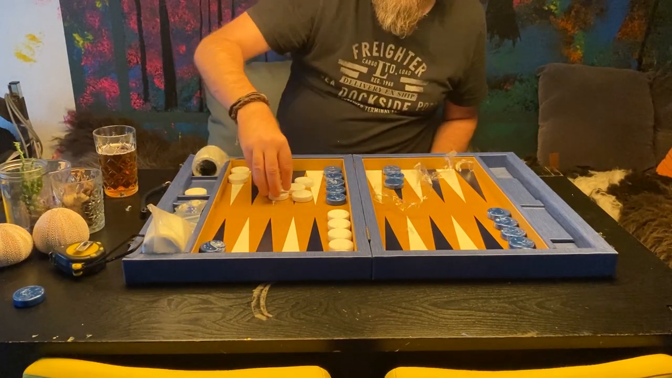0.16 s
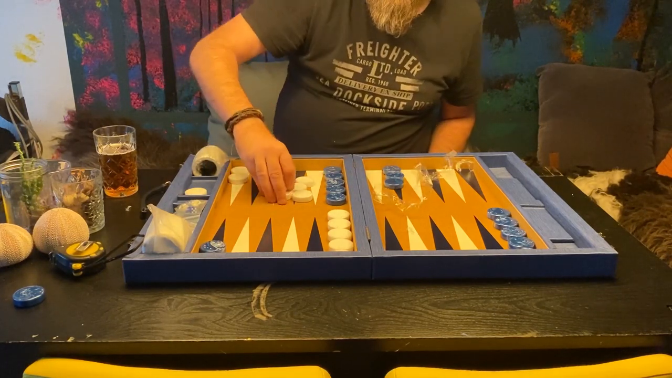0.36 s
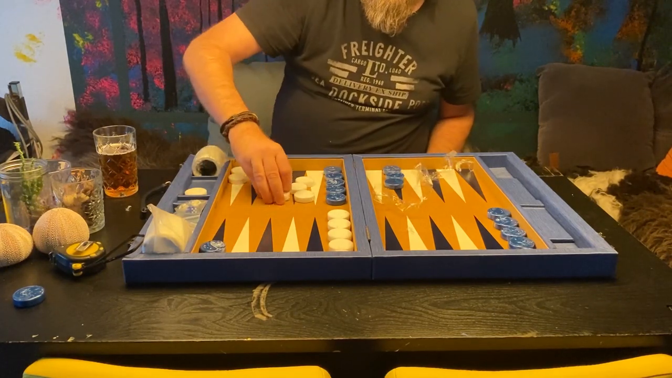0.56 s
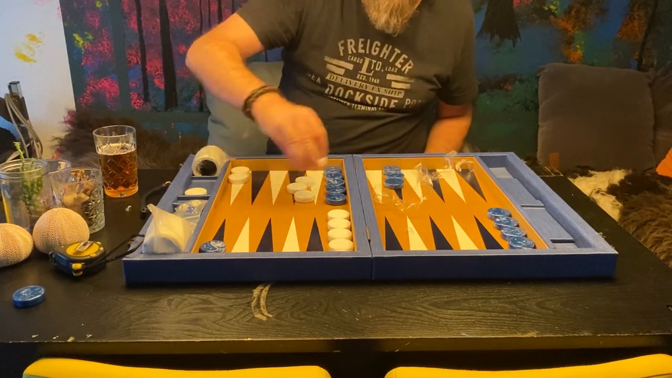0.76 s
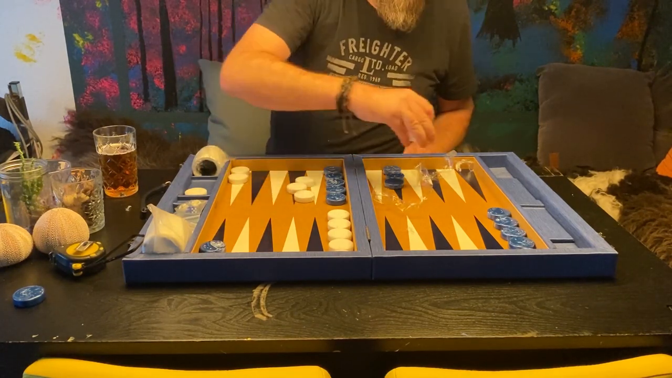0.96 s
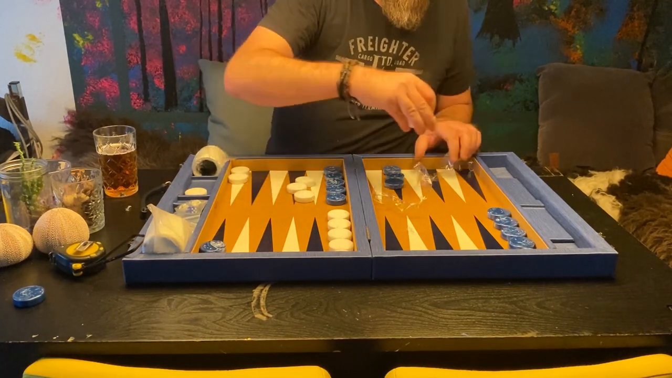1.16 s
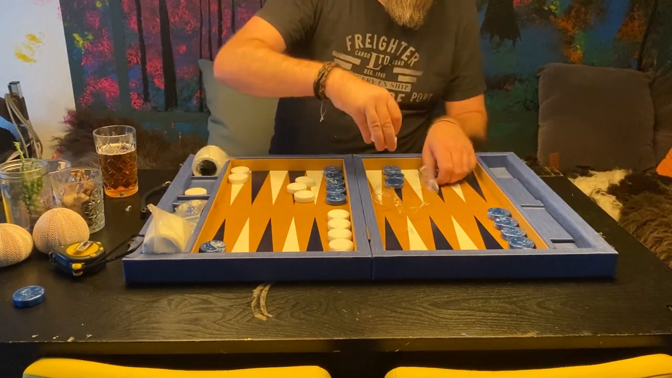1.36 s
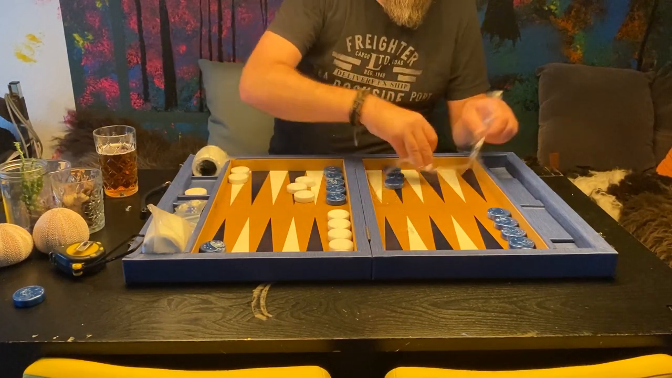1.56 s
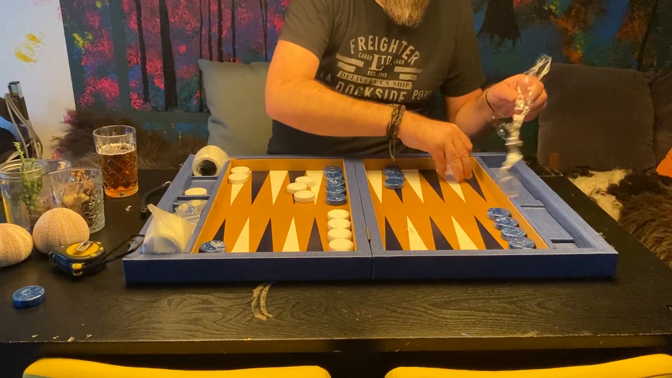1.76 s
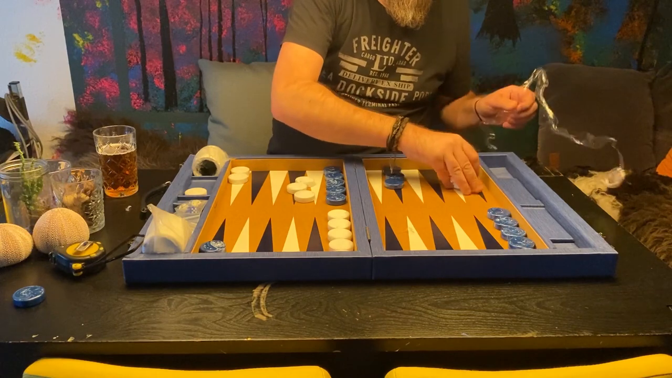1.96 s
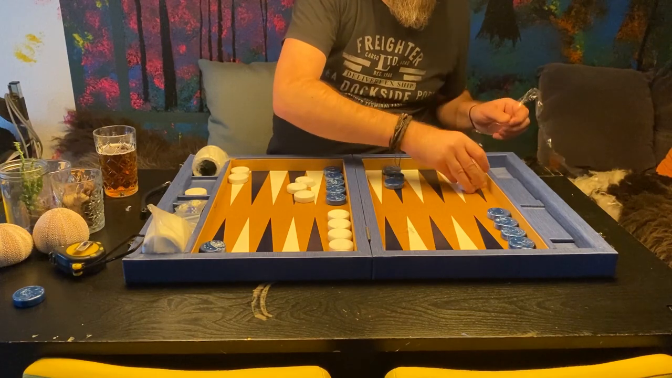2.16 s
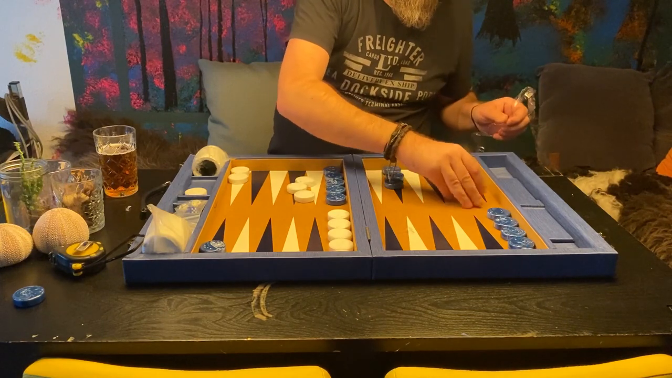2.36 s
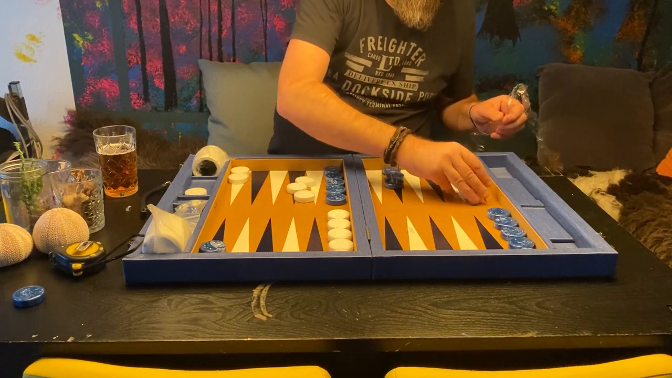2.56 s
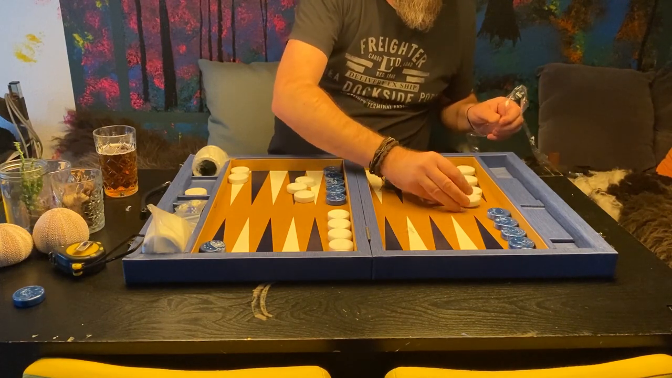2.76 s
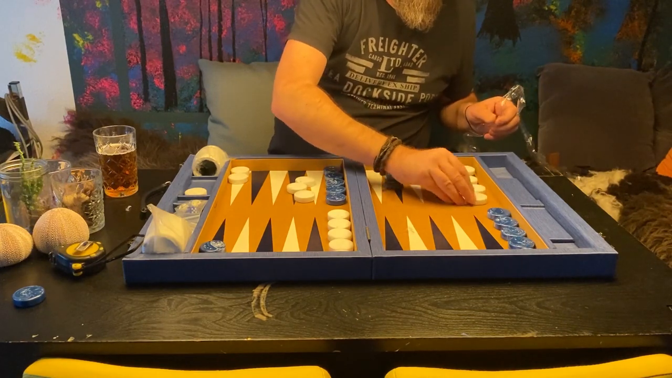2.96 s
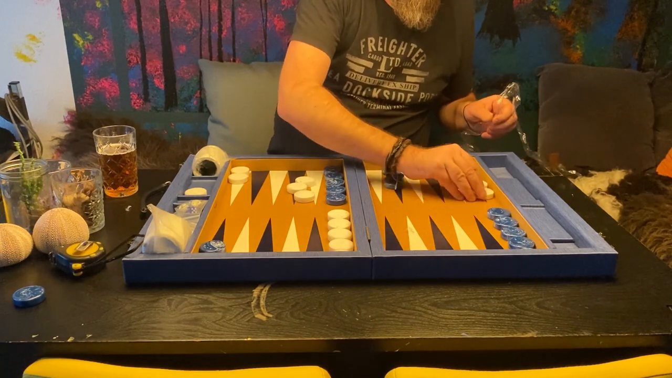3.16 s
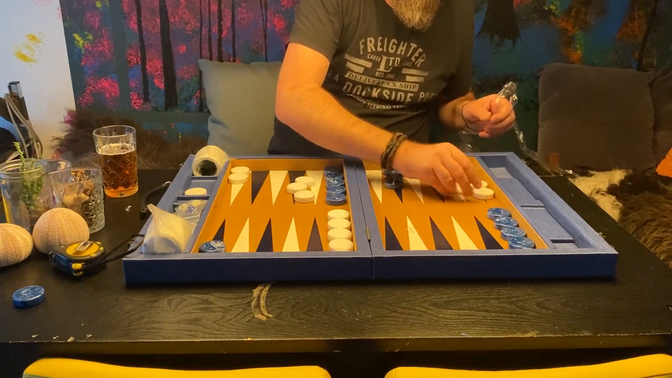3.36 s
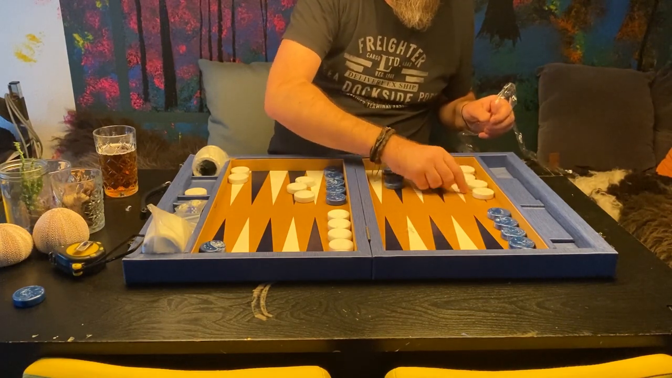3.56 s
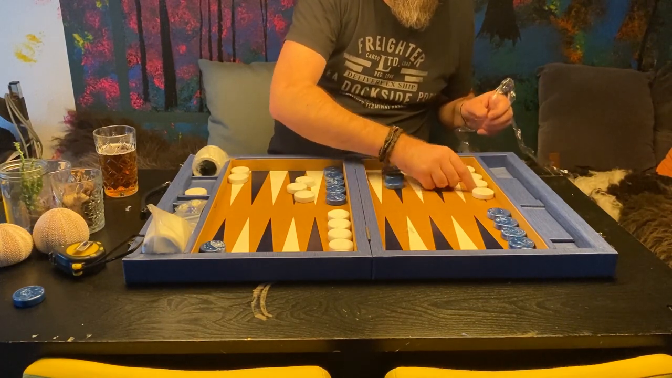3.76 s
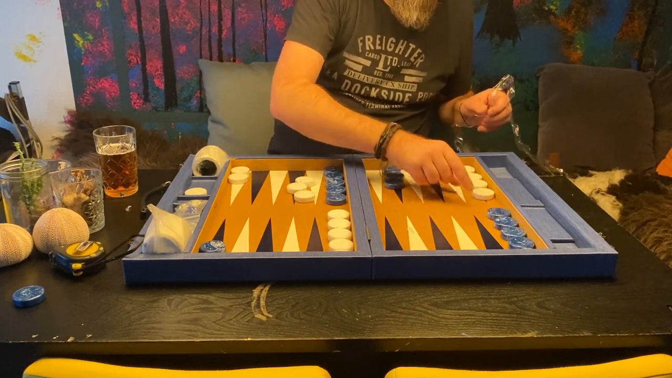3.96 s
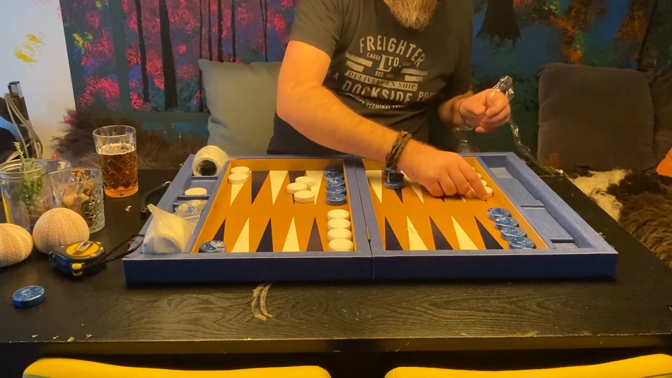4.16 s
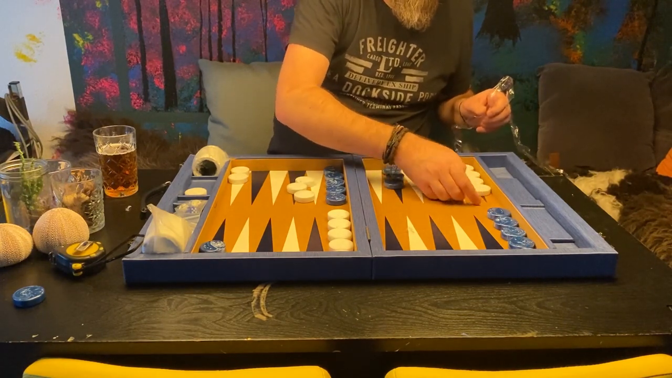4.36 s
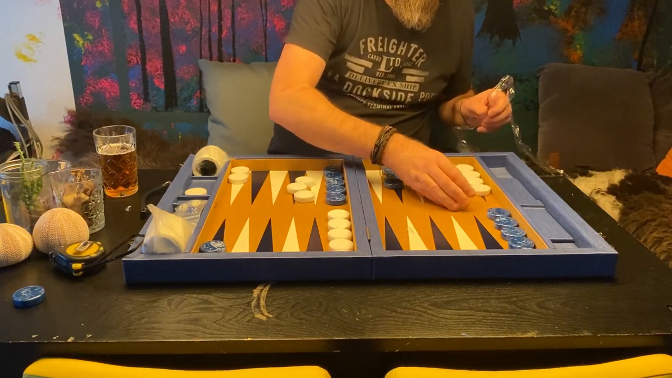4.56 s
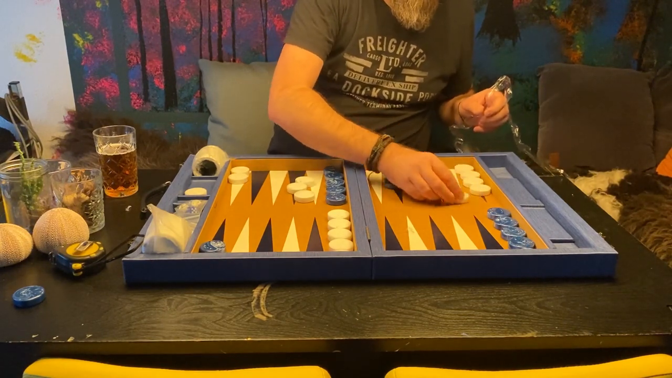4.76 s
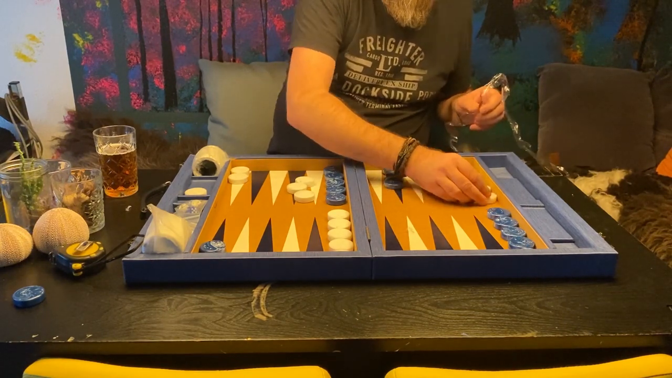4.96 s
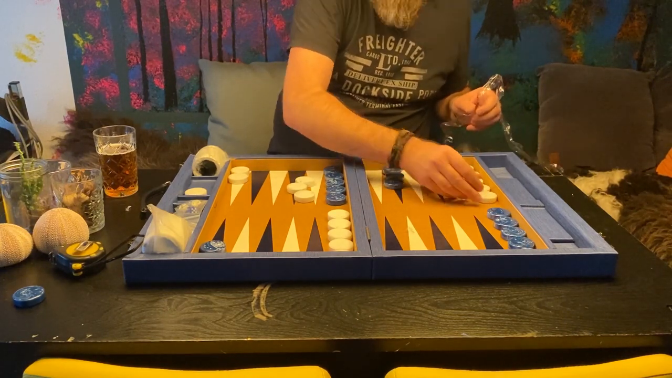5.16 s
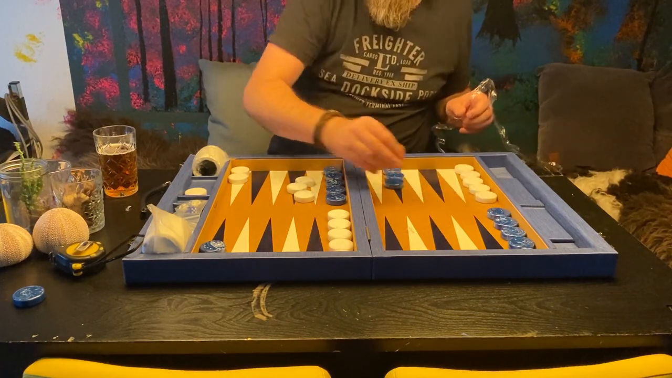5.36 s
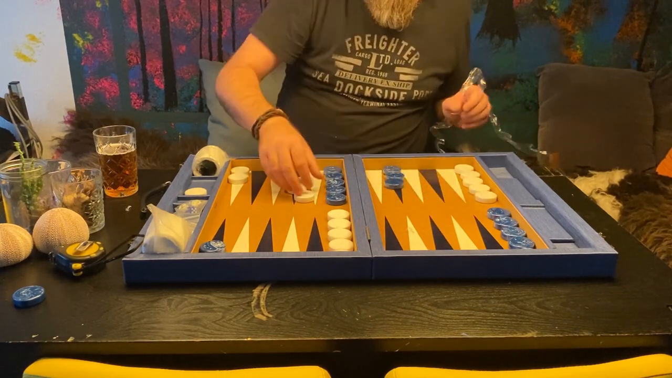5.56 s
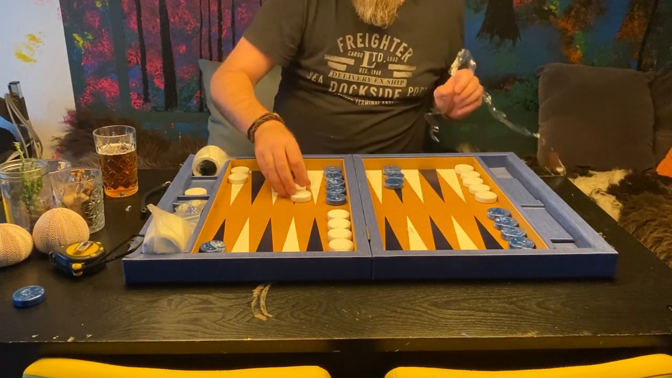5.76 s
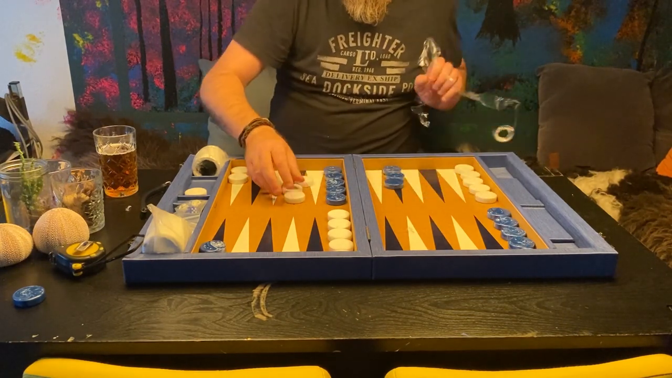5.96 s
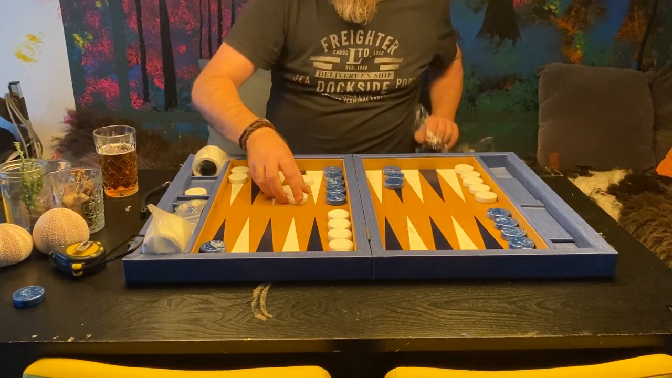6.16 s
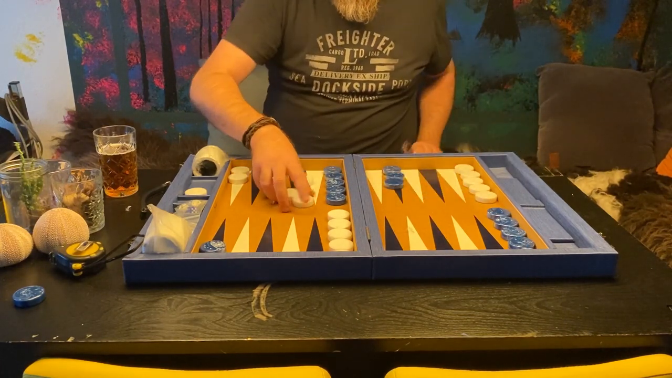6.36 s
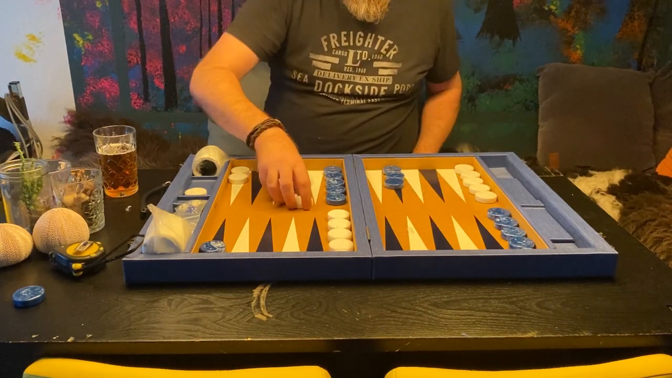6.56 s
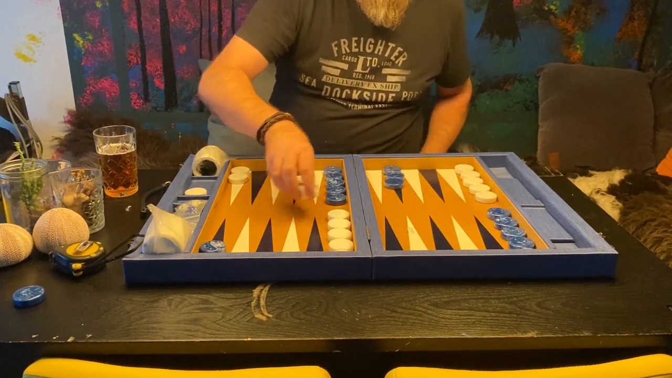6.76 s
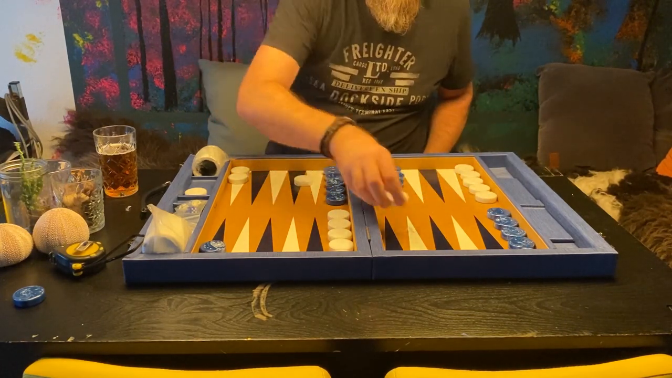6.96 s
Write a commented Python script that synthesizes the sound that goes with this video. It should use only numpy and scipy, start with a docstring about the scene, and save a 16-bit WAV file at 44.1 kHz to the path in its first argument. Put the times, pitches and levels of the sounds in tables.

```python
"""Checkers on a felt-lined wooden board in a furnished room. A hard plastic piece is set down and slid:
each touch clicks, knocks the hollow board and rings the checker. A plastic wrapper crackles, then a
busy clatter follows, with hand and board thumping the table. After a lull comes a second flurry, which
thins out into slides, a few snaps and soft knocks. A distant microphone with two treble notches hears
it all, with the room's tail on every blow and a quiet noise floor underneath."""
import sys
import numpy as np
from scipy import signal
from scipy.fft import rfft, irfft
from scipy.io import wavfile
from scipy.ndimage import uniform_filter1d

SR = 44100
rng = np.random.default_rng(int(sys.argv[2]) if len(sys.argv) > 2 else 0)


def file_out(sig):
    """Save sig as 16-bit WAV at sys.argv[1]."""
    # one column per channel
    cols = np.atleast_2d(sig).T
    # limit, then scale
    lim = np.clip(cols, -1, 1)
    pcm = np.round(lim * 32767).astype(np.int16)
    wavfile.write(sys.argv[1], SR, pcm)


N = 309141

# hand and board landing on the table: (time [s], level [dB], pitch [Hz])
TABLE_THUMPS = [(0.051, -83, 160), (0.338, -39.5, 133.4), (1.332, -48.5, 155.6), (1.357, -48, 132.8),
                (1.748, -39, 144.6), (2.09, -43.5, 167), (2.151, -45.5, 155), (2.478, -41.5, 157),
                (2.569, -42, 128.3), (2.693, -41, 149), (2.753, -42, 147), (2.994, -49.5, 152),
                (3.165, -49.5, 210.4), (3.735, -50.5, 160), (3.808, -61, 183), (4.137, -55.5, 139),
                (4.242, -52.5, 136), (4.522, -46.5, 146), (4.595, -44.5, 134), (4.772, -49.5, 126),
                (4.807, -44, 164), (5.04, -49.5, 152.4), (5.349, -73.5, 153.6), (5.713, -54, 117.2),
                (6.188, -49.5, 141.4), (6.291, -58, 110), (6.463, -52, 130), (6.502, -47, 145.4)]


def amp(db):
    """Decibels to gain."""
    return 10 ** (np.asarray(db) / 20)


def unit_rms(x):
    """Scale to an rms of one."""
    return x / np.sqrt(np.mean(x ** 2) + 1e-20)


def curve_at(points, hz, column=1):
    """Read a column of a table along a log-frequency axis."""
    points = np.array(points)
    return np.interp(np.log(hz), np.log(points[:, 0]), points[:, column])


def band(x, low_hz, high_hz):
    """Gentle band-pass."""
    edges = [low_hz, min(high_hz, SR / 2.2)]
    return signal.sosfilt(signal.butter(2, edges, "band", fs=SR, output="sos"), x)


def place(track, time_s, sound, level_db):
    """Mix a one-shot in, with its loudest 4 ms at the given rms level."""
    start = int(time_s * SR)
    loudest = np.sqrt(uniform_filter1d(sound ** 2, size=176, mode="constant").max())
    track[start:start + len(sound)] += (amp(level_db) * sound / loudest)[:N - start]


def struck(hz, gains, t60, rise_s, size=4096):
    """A struck body: damped modes that swell while the contact lasts."""
    t = np.arange(size) / SR
    decays = amp(-60 * np.outer(1 / np.asarray(t60), t))
    rings = np.sin(2 * np.pi * np.outer(hz, t)) * decays
    return (gains @ rings) * (1 - np.exp(-t / rise_s)) ** 2


def blunt_hit(hz, chance_db, cycles, rise_s):
    """A blunt contact excites close, dead modes around one pitch, two of them in opposite phase."""
    modes_hz = hz * np.array([.78, .9, 1, 1.12, 1.35])
    gains = amp([-19.5, -3, 8.5, -7, 2.5] + chance_db) * [-1, 1, 1, -1, 1]
    return struck(modes_hz, gains, cycles / modes_hz, rise_s)


def room_tone():
    """A steady, bass-heavy bed of room and microphone noise."""
    # noise spectrum: (frequency [Hz], relative density [dB])
    spectrum = [(15, -49), (25, -21.5), (70, -21), (91, -17.5), (112, -9.5), (131, -12), (208, -19),
                (283, -23), (331, -23), (600, -33.5), (954, -38.5), (1440, -41), (3850, -48.5), (6290, -52),
                (11500, -52), (14000, -85.5), (22000, -120)]
    hz = np.arange(N // 2 + 1) * SR / N + 1
    noise = irfft(rfft(rng.standard_normal(N)) * amp(curve_at(spectrum, hz)), N)
    return amp(-67.5) * unit_rms(noise)


def room_reverb(spots):
    """Strong echoes off table and near walls, then a tail dying band by band; each spot has its own."""
    # the room's tail: (frequency [Hz], t60 [s], relative level [dB])
    decay = [(80, 0.29, 4), (212, 0.68, 8), (570, 0.59, 11), (1380, 0.54, 6.5), (3600, 0.55, -1),
             (10100, 0.38, 7)]
    first_echo_s, early_db, early_t60_s = .004, 11, .028
    t = np.arange(SR) / SR
    density = np.clip(.024 + (t / .06) ** 2, 0, 1)   # echoes thicken with the square of time
    arrivals = (rng.random((2, len(spots), SR)) < density) * (t > first_echo_s) / np.sqrt(density)
    early_lift = 1 + amp(early_db - 60 * t / early_t60_s)
    echoes = rng.standard_normal(arrivals.shape) * arrivals * early_lift
    edges_hz, tails = 40 * 2 ** np.arange(0, 9, .5), 0
    for k, (low, high) in enumerate(zip(edges_hz, edges_hz[1:])):
        hz = np.sqrt(low * high)
        fade = amp(curve_at(decay, hz, column=2) - 60 * t / curve_at(decay, hz))
        tails = tails + band(echoes[k % 2] * fade, low, high)
    return signal.fftconvolve(spots, tails / np.sqrt(SR / 40), axes=1)[:, :N].sum(axis=0)


def frame_rumble():
    """The table frame shakes faintly all the time and shudders on after every thump."""
    rest_db, send_db, t60_s = -85.5, -22.5, .8
    evening = .6   # share of the thumps' level swings that the frame does not follow
    time_s, level_db, _ = np.transpose(TABLE_THUMPS)
    kicks = np.zeros(N)
    kicks[(time_s * SR).astype(int)] = amp(level_db + send_db - evening * (level_db - level_db.mean()))
    shudder = signal.lfilter([1], [1, -amp(-60 / (t60_s * SR))], kicks)
    sub_noise = unit_rms(band(rng.standard_normal(N), 28, 50))
    return band((amp(rest_db) + shudder) * sub_noise, 20, 70)


def hiss_and_scuff():
    """Rubbing strokes and the bright tails of hard hits: dense uneven grains that swell and fade."""
    # swells of hiss and scuff: (peak time [s], rise [s], fade [s], hiss [dB], scuff [dB])
    swells = [(.35, 0.031, 0.27, -49.5, -53.5), (0.661, 0.076, 0.08, -58, -65), (.98, .05, .04, -68, -81),
              (1.22, .02, .2, -56, -59.5), (1.299, .04, 0.033, -54, -57), (1.432, 0.066, 0.24, -36, -41),
              (1.66, 0.018, 0.12, -88, -62), (1.78, 0.12, 0.081, -80, -53), (2.05, 0.12, 0.038, -56, -69),
              (2.109, 0.015, 0.052, -33, -28), (2.2, 0.089, 0.052, -52, -52.5),
              (2.36, 0.095, 0.17, -61, -56.5), (2.49, 0.059, .05, -62.5, -53.5),
              (2.58, .02, .05, -51.5, -51.5), (2.69, 0.011, .05, -57.5, -48.5),
              (3.05, .09, 0.12, -52, -48.5), (3.34, 0.023, .06, -43.5, -60),
              (3.451, .1, 0.067, -54.5, -57.5), (3.77, .12, 0.036, -54, -70), (3.9, 0.14, 0.18, -57.5, -64),
              (4.16, .04, 0.048, -55.5, -60.5), (4.25, 0.065, .15, -67, -58), (4.57, .07, 0.21, -45.5, -51),
              (4.82, .2, 0.59, -60, -61), (5.18, 0.11, .05, -85, -58), (5.35, .14, .09, -67.5, -76),
              (5.779, 0.41, .2, -57.5, -65), (5.88, .1, .05, -49.5, -56), (5.97, .05, .09, -74.5, -59.5),
              (6.25, .08, 0.38, -52.5, -55), (6.37, 0.3, 0.14, -60, -60.5),
              (6.518, 0.076, 0.17, -35, -41.5), (6.75, .3, 0.26, -52, -53.5), (6.97, .04, .1, -90, -66)]
    drop_db, scuff_linger = 28, 1.5   # the hiss drops this far over a rise or fade; the scuff is slower
    felt_hz, felt_db = 4700, -15.5   # felt under plastic favours one band
    t = np.arange(N) / SR
    hiss_gain, scuff_gain = 0, amp(-85.5)   # a trace of scuff stays between swells
    for peak_s, rise_s, fade_s, hiss_db, scuff_db in swells:
        lost_db = drop_db * np.maximum((peak_s - t) / rise_s, (t - peak_s) / fade_s) ** 1.06
        hiss_gain = hiss_gain + amp(hiss_db - lost_db)
        scuff_gain = scuff_gain + amp(scuff_db - lost_db / scuff_linger)
    grains = rng.standard_normal((2, N)) * amp(3.2 * np.minimum(rng.exponential(1, (2, N)), 5))
    flicker_db = 2 * unit_rms(band(rng.standard_normal(N), 8.1, 40))   # rubbing catches and slips
    grains *= amp(flicker_db)
    hiss = signal.sosfilt(signal.butter(8, 15000, fs=SR, output="sos"), band(grains[1], 8800, 12000))
    felt = unit_rms(band(grains[0], felt_hz / 1.3, felt_hz * 1.15))
    scuff = unit_rms(band(grains[0], 710, 7000)) + amp(felt_db) * felt
    return hiss_gain * unit_rms(hiss) + scuff_gain * unit_rms(scuff)


def table_thumps():
    """Soft blows set the table top booming."""
    track = np.zeros(N)
    for time_s, level_db, hz in TABLE_THUMPS:
        modes_hz = hz * np.array([.4, .75, 1, 1.4, 2, 2.7])
        boom = struck(modes_hz, amp([-15, -4, -1, -3, -3, 0]), t60=15 / modes_hz, rise_s=.0038, size=16384)
        place(track, time_s, boom, level_db)
    return track


def bright_snaps():
    """Wrapper creases and the catch as a stroke begins: a few milliseconds of noise with a bright top."""
    # short bright snaps: (time [s], level [dB], centre [Hz], top end [dB])
    snaps = [(1.2042, -54.5, 5590, -82), (1.285, -46.5, 4660, -59), (1.391, -33, 4740, -38),
             (1.405, -43, 4580, -36.5), (1.4283, -30.5, 5130, -48), (1.436, -31.5, 4234, -39.5),
             (1.4462, -26.5, 3590, -20.5), (1.4687, -30, 3450, -48.5), (1.502, -58.5, 4730, -31),
             (1.5027, -24, 4600, -29), (1.5389, -41, 2030, -32.5), (1.6614, -37.5, 4980, -38),
             (1.721, -34.5, 6860, -55), (3.3291, -51, 3880, -48), (3.4188, -55, 4600, -45),
             (3.666, -68, 4010, -66), (5.3511, -46.5, 4400, -49), (5.686, -63, 4500, -64),
             (5.9643, -52.5, 3850, -47.5), (5.9882, -55, 4650, -61), (6.154, -61, 4880, -54),
             (6.2923, -43, 2860, -37), (6.964, -64, 3470, -51)]
    track, t60_s = np.zeros(N), .014
    fade = amp(-60 * np.arange(1024) / SR / t60_s)
    for time_s, level_db, hz, top_db in snaps:
        burst = rng.standard_normal(1024) * fade
        place(track, time_s, band(burst, hz / 1.42, hz * 1.8), level_db)
        place(track, time_s, band(burst, 7500, 12000), top_db)
    return track


def checker_touches():
    """Plastic meets board or plastic: a click with a noisy edge, a knock of board and rim, a thin ring."""
    # checkers landing and colliding: (time [s], click [dB], click pitch [Hz], board knock [dB],
    # knock pitch [Hz], rim [dB], rim pitch [Hz], checker ring [dB])
    hits = [(.3344, -30.5, 5960, -41.5, 348, -28.5, 2407, -33.5),
            (.3375, -42.5, 4200, -40.5, 1010, -39.5, 2700, -37.5),
            (.8764, -95, 3300, -72, 812, -99, 2400, -100),
            (1.5747, -57.5, 5240, -64, 1707, -37.5, 2020, -40),
            (1.7416, -45, 3120, -27, 1220, -37.5, 2300, -51),
            (1.7565, -41, 3500, -25.5, 1540, -38, 2080, -46),
            (1.8008, -34.5, 2710, -39.5, 940, -29.5, 2160, -45),
            (1.8083, -43.5, 4200, -27.5, 1300, -31.5, 2290, -61),
            (1.8556, -47, 4440, -37, 1100, -45, 2700, -65),
            (1.8921, -55, 5460, -35, 1510, -36.5, 1900, -71),
            (2.0845, -51.5, 3280, -31.5, 1050, -38, 1730, -55),
            (2.1019, -33, 5500, -31.5, 850, -59, 2880, -13.5),
            (2.1101, -26.5, 6160, -31.5, 1340, -37, 1870, -22.5),
            (2.1476, -27.5, 5600, -29.5, 1400, -31.5, 2500, -27),
            (2.193, -27, 4530, -41, 790, -38, 2200, -37),
            (2.4718, -41.5, 4360, -22.5, 1010, -33, 1944, -41.5),
            (2.4928, -40, 5270, -29.5, 1170, -31.5, 1800, -43),
            (2.4981, -42, 4900, -36, 960, -38, 2470, -35.5),
            (2.5061, -40.5, 4530, -33.5, 533, -52, 2160, -45),
            (2.5369, -39, 5040, -36, 780, -43, 1950, -31.5),
            (2.5672, -33.5, 5400, -29.5, 800, -29.5, 1840, -35.5),
            (2.5892, -40.5, 3400, -33, 980, -40, 1920, -51),
            (2.6887, -48.5, 3770, -32.5, 870, -46, 2480, -50),
            (2.694, -29, 4190, -36.5, 430, -34, 2400, -54.5),
            (2.7467, -58, 3360, -39, 990, -24.5, 1660, -41),
            (2.7512, -32.5, 2940, -23.5, 990, -28.5, 1850, -41),
            (2.8943, -55.5, 4470, -34, 910, -45, 2120, -73),
            (2.9913, -44.5, 4660, -33, 873, -39.5, 2160, -57),
            (3.036, -26.5, 4520, -46.5, 663, -32, 2520, -42.5),
            (3.111, -32.5, 3830, -51.5, 1010, -47, 2570, -44),
            (3.7333, -70.5, 3610, -54, 373, -78, 2810, -74),
            (3.8085, -39.5, 3510, -54.5, 1180, -48.5, 1900, -55),
            (4.2364, -27, 3640, -40, 1130, -51, 2370, -40), (4.2718, -38, 3500, -45, 1230, -40, 2760, -61),
            (4.2852, -27, 3840, -39.5, 1180, -33.5, 2310, -43),
            (4.3389, -35.5, 4100, -48.5, 725, -70, 2800, -57),
            (4.3502, -50, 4250, -59, 1560, -43, 2560, -47), (4.5205, -69, 3560, -40, 600, -59, 2200, -71.5),
            (4.5932, -45, 5300, -26, 1100, -34.5, 2010, -61),
            (4.6059, -63, 3730, -42, 1120, -66, 2010, -66.5),
            (4.6907, -57, 4100, -35, 900, -41.5, 1870, -54),
            (4.7711, -61, 3380, -31.5, 850, -40.5, 1930, -49.5),
            (4.808, -45.5, 5350, -29.5, 1090, -34.5, 1880, -66),
            (5.0721, -36, 4140, -51.5, 1620, -47, 2430, -43),
            (5.0845, -51, 3880, -58, 1690, -39, 2560, -66),
            (5.0932, -36.5, 4170, -54.5, 740, -49, 2600, -60),
            (5.1038, -37, 4100, -50.5, 1650, -44, 2120, -50.5),
            (5.113, -47, 4060, -70.5, 1300, -39.5, 2780, -51.5),
            (5.717, -79, 4880, -55, 927, -73.5, 1900, -75.5), (5.7447, -79, 3430, -58, 960, -77, 1990, -68),
            (6.1992, -79, 3250, -41, 900, -42.5, 2430, -53.5),
            (6.2198, -49.5, 3330, -41.5, 850, -44, 2160, -57),
            (6.4543, -81, 4500, -30, 930, -47, 1840, -57.5), (6.4894, -55, 3430, -41, 1030, -41, 2000, -53),
            (6.5061, -50, 3700, -39, 1060, -38.5, 1840, -48),
            (6.9385, -59, 2830, -61, 1420, -54, 2400, -93)]
    # modes of the hollow board: (frequency [Hz], relative level [dB], t60 [s])
    board_modes = [(330, -2, .02), (415, 2, .03), (520, -3, .012), (640, -3, .012), (800, 0, .018),
                   (930, 0, .02), (1000, 0, .02), (1180, 0, .018), (1250, -1, .014), (1385, 0, .012),
                   (1600, -3, .008)]
    # modes of a checker: (frequency [Hz], relative level [dB], t60 [s])
    checker_modes = [(10370, -3, .012), (10540, 0, .022), (10680, -3, .012)]
    board_hz, board_db, board_t60 = np.transpose(board_modes)
    checker_hz, checker_db, checker_t60 = np.transpose(checker_modes)
    spots = np.zeros((4, N))   # touches take turns among four spots on the board
    direct = np.zeros(N)   # extra click and knock, beamed straight at the microphone
    chances_db = 2.5 * rng.normal(0, 1, (len(hits), len(board_modes)))
    polarity = (-1) ** (np.arange(len(board_modes)) // 3)   # opposed groups of modes make a knock swell
    bursts = rng.standard_normal((len(hits), 256)) * amp(-60 * np.arange(256) / SR / .001)
    for k, (time_s, click_db, click_hz, knock_db, knock_hz, rim_db, rim_hz, ring_db) in enumerate(hits):
        spot, chance_db = spots[k % 4], chances_db[k]
        contact_s = .00016 * amp(-(click_db + 25) / 2)   # the softer the touch, the longer the contact
        click = blunt_hit(click_hz, chance_db[:5], cycles=12, rise_s=contact_s)
        place(spot, time_s, click, click_db)
        place(direct, time_s, click, click_db - 5)
        place(spot, time_s, band(bursts[k], 1000, 7000), click_db - 7)   # crack
        place(spot, time_s, band(bursts[k], 7100, 11000), click_db - 21.5)   # tick

        # the point struck favours board modes near one pitch
        favour_db = np.maximum(-28 * np.log2(board_hz / knock_hz) ** 2, -24)
        knock = struck(board_hz, amp(board_db + favour_db + chance_db) * polarity, board_t60, rise_s=.0013)
        place(spot, time_s, knock, knock_db)
        place(direct, time_s, knock, knock_db - 7)

        rim = blunt_hit(rim_hz, chance_db[-5:], cycles=18, rise_s=.0005)
        place(spot, time_s, rim, rim_db)
        ring = struck(checker_hz, amp(checker_db + chance_db[5:8]), checker_t60, rise_s=.00025)
        place(spot, time_s, ring, ring_db)
    return spots, direct


def scene():
    """Touches, snaps and thumps feed the reverb; hiss, scuff, rumble and room tone stay dry."""
    spots, direct = checker_touches()
    spots[0] += bright_snaps() + table_thumps()
    blows = spots.sum(axis=0) + direct + amp(-5) * room_reverb(spots)
    return (blows + hiss_and_scuff() + frame_rumble() + room_tone())[None]


def record(dry):
    """The microphone housing notches the treble twice; a steep low-pass cuts the top."""
    # housing notches: (centre [Hz], width [Hz], depth [gain])
    notches = [(8440, 3100, 0.25), (11980, 8900, 0.018)]
    cutoff_hz = 15800
    for hz, width_hz, depth in notches:
        pole, zero = np.exp(-np.pi * width_hz / SR * np.array([1, depth]))
        tuning = -2 * np.cos(2 * np.pi * hz / SR)
        dry = signal.lfilter([1, tuning * zero, zero ** 2], [1, tuning * pole, pole ** 2], dry) * pole / zero
    return signal.sosfilt(signal.ellip(10, .5, 60, cutoff_hz, fs=SR, output="sos"), dry)


dry = scene()
out = record(dry)
file_out(out)
```